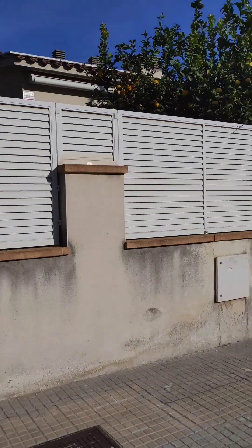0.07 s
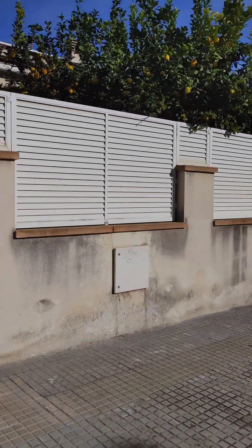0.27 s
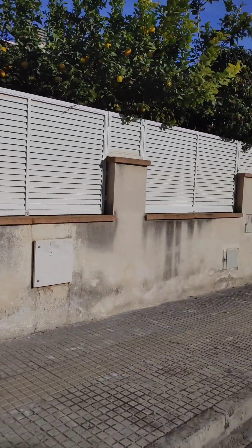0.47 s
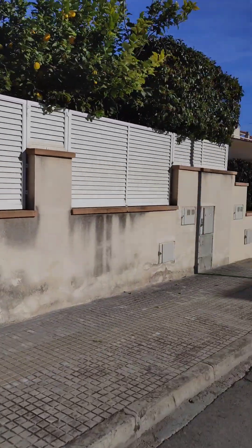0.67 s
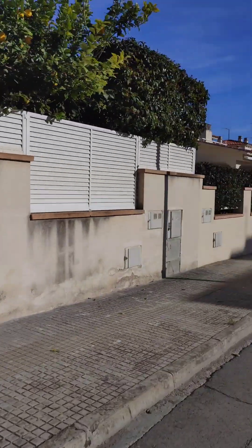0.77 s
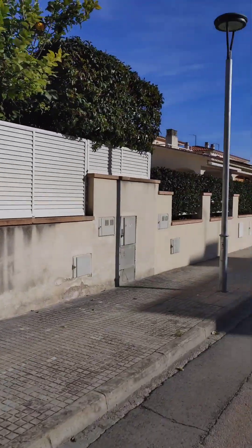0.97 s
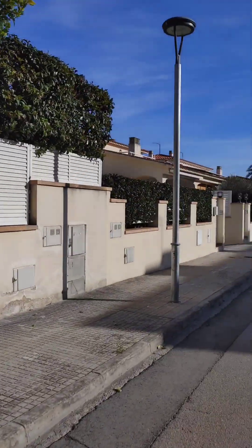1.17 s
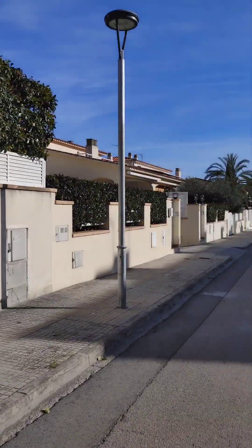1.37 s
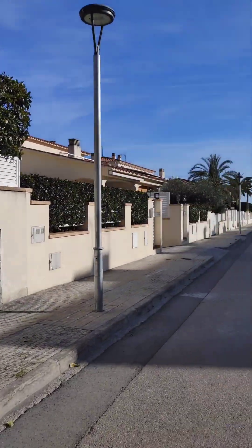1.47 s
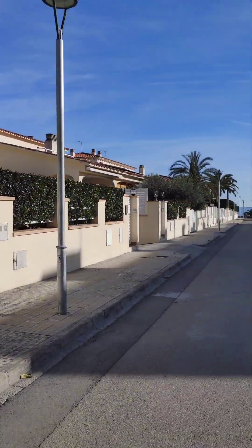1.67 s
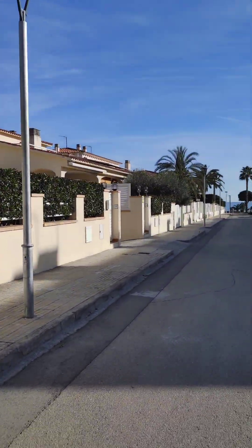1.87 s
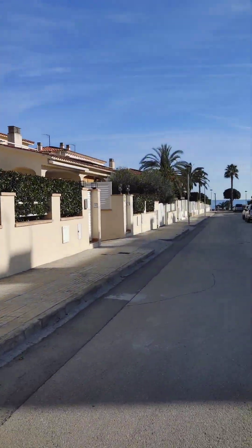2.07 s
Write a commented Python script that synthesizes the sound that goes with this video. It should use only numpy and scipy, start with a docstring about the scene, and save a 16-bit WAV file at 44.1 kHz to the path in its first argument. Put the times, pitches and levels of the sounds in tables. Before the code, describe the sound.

A dove coos in soft falling notes while low wind buffets the microphone outdoors

```python
"""Dove in a quiet street

A dove coos in gliding, near-pure tones while someone walks along with a hand-held camera. Light wind
buffets the two microphone ports as low shaped noise plus short thuds. A small metal piece, perhaps keys
or a zip pull, clinks close by as ringing modes. Dry ticks are short noise bands, small birds chirp far off
as fluttering glides, and the neighbourhood is a soft wash of shaped noise."""
import sys
import numpy as np
from scipy import signal
from scipy.fft import rfft, irfft
from scipy.io import wavfile
from scipy.ndimage import uniform_filter1d

SR = 44100
rng = np.random.default_rng(int(sys.argv[2]) if len(sys.argv) > 2 else 0)


def wrap_up_sound(samples):
    """Save the sound to the file named by the first command line argument, as 16-bit audio."""
    columns = np.atleast_2d(samples).T
    # keep every value between -1 and 1, then stretch to whole-number steps
    tamed = np.clip(columns, -1, 1)
    steps = np.round(tamed * 32767).astype(np.int16)
    wavfile.write(sys.argv[1], SR, steps)


N = 93888
T = np.arange(N) / SR  # time [s]

# notes of the cooing, one list each: (time [s], pitch [Hz], level [dB])
COO_NOTES = [
    [(-.02, 613.5, -66), (.075, 573.4, -66), (.125, 532, -68), (.165, 475.7, -55), (.2, 436.8, -56),
     (.262, 396.5, -56), (.28, 387, -50.5)],
    [(.575, 489, -64), (.612, 535, -58.5), (.645, 533, -65), (.69, 519, -56.5), (.765, 497, -64)],
    [(.625, 480, -58), (.665, 469, -57)],
    [(.782, 487.5, -56), (.825, 426, -55.5), (.86, 456, -58.5), (.885, 414, -56)],
    [(.932, 445, -51), (.96, 435.8, -56), (.99, 435.7, -49.5), (1.018, 444.8, -47.5), (1.04, 421.3, -54),
     (1.09, 409, -55.5), (1.135, 361.4, -55.5), (1.2, 331, -58)],
    [(1.4, 433.7, -51), (1.425, 463.5, -53), (1.465, 459, -48), (1.505, 463.3, -53), (1.54, 467, -56),
     (1.585, 449, -54.5)],
]
# husky band above one coo: (start [s], length [s], centre [Hz], level [dB])
HUSKY_BAND = (.56, 0.01, 912, -66.5)
# wind strength at each port: (time [s], level [dB])
WIND_LEFT = [(0, -73), (.35, -57), (.51, -49.5), (.55, -55.5), (.585, -40), (.67, -57.5), (.87, -46.5),
             (1.07, -51), (1.11, -35.5), (1.2, -51.5), (1.33, -32), (1.385, -46.5), (1.41, -67),
             (1.56, -74), (1.68, -43), (1.78, -76), (2.13, -67)]
WIND_RIGHT = [(0, -29.5), (.115, -30), (.2, -53.5), (.34, -66), (.38, -42.5), (.425, -64), (.465, -39),
              (.59, -68), (.67, -39), (.77, -37.5), (.81, -41.5), (.97, -38.5), (1.08, -38.5), (1.29, -43),
              (1.405, -37), (1.43, -31), (1.61, -35.5), (1.66, -44.5), (1.75, -33.5), (1.9, -35.5),
              (2.06, -35), (2.13, -47)]
# relative colour of the wind rumble before its shift: (frequency [Hz], density [dB per Hz])
RUMBLE_LEFT = [(20, -20), (50, -10), (100, 0), (155, 0), (200, -10), (260, -24), (400, -37), (600, -52),
               (1500, -80)]
RUMBLE_RIGHT = [(20, -21), (50, -22), (95, 4), (155, 7.5), (230, -8.5), (340, -13.5), (450, -36.5),
                (600, -34), (1500, -83)]
# shift of the right port's rumble, higher in faster air: (time [s], frequency ratio [1])
EDDY_SHIFT = [(0, 0.88), (.5, 0.67), (1, 1.21), (1.45, 1.12), (2.1, 1.135)]
# single eddies thudding on the right port: (time [s], pitch [Hz], level [dB])
EDDY_THUDS = [(0.064, 190, -25), (0.732, 219, -26), (0.77, 99, -27), (1.12, 360, -34), (1.166, 345, -34),
              (1.425, 173, -26), (1.435, 300, -29.5), (1.526, 310, -32.5), (1.689, 355, -32),
              (1.748, 286, -31.5), (1.774, 279, -28), (1.862, 298, -30), (1.9, 112, -27.5),
              (2.036, 354, -29.5)]
# clinks of metal: (time [s], level [dB], frequency around which the metal rings most [Hz])
CLINKS = [(.411, -56.5, 5740), (0.955, -57.5, 5750), (0.974, -57, 6600), (1.588, -62, 5700),
          (1.663, -52.5, 4450), (1.696, -58, 5600), (1.73, -58.5, 4800), (1.983, -50.5, 5240),
          (2.015, -59.5, 5000), (2.119, -54, 5000)]
# ringing modes of the metal, before random spread: (frequency [Hz], relative level [dB], t60 [s])
METAL_MODES = [(3860, -16, .025), (4370, -15, .035), (5025, -14, .06), (5740, -16, .05), (6600, -18, .03),
               (9390, -21, .04)]
# light dry ticks, like grit under a shoe: (time [s], level [dB], centre [Hz])
TICKS = [(0.198, -63.5, 10900), (0.242, -65, 6400), (1.078, -57, 1620), (1.836, -67.5, 4140),
         (2.052, -64, 4150), (2.118, -59, 1700)]
# chirps of small birds: (start [s], length [s], start pitch [Hz], end pitch [Hz], level [dB])
CHIRPS = [(0.138, 0.15, 6290, 6600, -76), (0.58, 0.074, 6200, 6450, -74), (0.778, 0.048, 6850, 6850, -73.5),
          (0.869, 0.11, 2720, 2620, -76), (1.11, 0.054, 4190, 4750, -69.5),
          (1.165, 0.05, 4420, 4720, -74.5), (1.254, 0.046, 6660, 6310, -71.5),
          (1.303, 0.031, 4840, 5080, -65), (1.547, 0.045, 5700, 6000, -72.5)]
# relative colour of the distant street noise: (frequency [Hz], density [dB per Hz])
AIR_COLOUR = [(20, 7), (120, 7.5), (330, 10.5), (480, 6.5), (620, 1), (880, -2), (1100, -7.5), (1400, -4),
              (2500, -7), (3200, -12), (4200, -11.5), (6700, -17), (7800, -26), (9500, -19.5), (15500, -20)]
# its stereo balance: (frequency [Hz], left minus right [dB])
AIR_PAN = [(100, -4), (700, -1), (1500, -5), (2800, 0), (5500, -4.5), (9000, -4), (15000, -0.5)]
# its left-right likeness: (frequency [Hz], correlation [1])
AIR_LIKENESS = [(100, 1), (600, 0.31), (1500, 0.069), (4000, 0.027)]
# its loudness: (time [s], level [dB])
AIR_LEVEL = [(0, -56), (.1, -60), (.18, -55.5), (.35, -56.5), (.68, -55.5), (1.12, -55), (1.47, -59.5),
             (1.6, -56.5), (1.69, -53.5), (1.8, -58), (2.13, -56.5)]

COO_EDGE_S, COO_JITTER, COO_SHIMMER_DB = .009, .011, 1.8  # jitter as a share of pitch, rms
OVERTONE_DB, COO_PAN_DB, COO_ECHO_DB = -33, 0.5, -12.5
FLUTTER_DB, FLUTTER_HZ = 1.4, 32
BUFFET_CYCLES = 1.23  # half-width of a thud, in cycles of its pitch
FAVOUR_DB, FAVOUR_HZ = 10.5, 435  # boost and half-width around a clink's favoured frequency
MODE_SPREAD_DB, MODE_DETUNE = 3, .012
SCRAPE_DB, SCRAPE_S = -12, 0.0043
CLINK_RISE_S, CLINK_PAN_DB, PORT_DELAY_S = 0.0035, -16, .0005
TICK_S, TICK_PAN_DB = 0.0061, -15
CRACKLE_DB, CRACKLE_PER_S = -71, 16
CHIRP_JITTER, CHIRP_FLUTTER_DB, CHIRP_FLUTTER_HZ = .018, 3.5, 70
CHIRP_PAN_DB, CHIRP_ECHO_DB = -12, -2
STREET_T60_S = 0.5
AIR_PATCH_DB = 1.3
EDGE_HZ = 15700
FRAME, HOP = 2048, 512  # short-time spectra [samples]


def amp(db):
    """Decibels to gain."""
    return 10 ** (np.asarray(db) / 20)


def unit(x):
    """Scales to rms 1."""
    return x / np.sqrt(np.mean(x ** 2) + 1e-20)


def curve(points, t=T):
    """Reads a table over time."""
    return np.interp(t, *np.transpose(points))


def read(points, hz):
    """Reads a table over log frequency."""
    f, value = np.transpose(points)
    return np.interp(np.log(hz + 1), np.log(f + 1), value)


def glide(hz):
    """Phase [radians] of a tone whose pitch moves over time."""
    return 2 * np.pi * np.cumsum(hz) / SR


def pan(db):
    """Left and right gains for a level difference."""
    db = np.atleast_1d(db)
    return amp(np.array([db, -db]) / 2)


def add(mix, s, sound):
    """Mixes a sound in at a time."""
    part = mix[max(round(s * SR), 0):][:len(sound)]
    part += sound[:len(part)]


def noise(lo_hz, hi_hz):
    """Noise of rms 1 between two soft edges."""
    f = np.fft.rfftfreq(N, 1 / SR) + 1e-3
    spectrum = rfft(rng.standard_normal(N))
    spectrum = spectrum / (1 + (f / hi_hz) ** 4) / (1 + (lo_hz / f) ** 4)
    return unit(irfft(spectrum, N))


def cells(shape):
    """Random complex short-time spectra."""
    return rng.standard_normal(shape) + 1j * rng.standard_normal(shape)


def frames():
    """Bin frequencies and frame times of the short-time spectra."""
    return np.fft.rfftfreq(FRAME, 1 / SR), np.arange(N // HOP + 3)[:, None] * HOP / SR


def sound_of(z):
    """Short-time spectra to a signal of rms 1."""
    x = signal.istft(np.swapaxes(z, -1, -2), nperseg=FRAME, noverlap=FRAME - HOP)[1]
    return unit(x[..., :N])


def smooth(x, size, axis=-1):
    """Running mean, applied twice."""
    return uniform_filter1d(uniform_filter1d(x, size=size, axis=axis), size=size, axis=axis)


def street(x):
    """Scattered, decaying echoes from garden walls and house fronts, separate for each side."""
    t = np.arange(SR // 2) / SR
    hit = rng.random((2, len(t))) < 2000 / SR  # about 2000 echoes per second
    taps = rng.standard_normal(hit.shape) * hit * (t > .012) * amp(-60 * t / STREET_T60_S)
    taps /= np.linalg.norm(taps, axis=1, keepdims=True)
    return signal.fftconvolve(x[None], taps, axes=1)[:, :N]


def dove():
    """Each coo is an almost pure, slightly unsteady gliding tone; a faint husky band lies above one of them."""
    out = np.zeros(N)
    for note in COO_NOTES:
        s, hz, db = np.transpose(note)
        phase = glide(np.interp(T, s, hz) * (1 + COO_JITTER * noise(14, 50)))
        tone = unit(np.sin(phase) + amp(OVERTONE_DB) * np.sin(2 * phase))
        to_edge = np.minimum(T - s[0], s[-1] - T)
        gate = np.sin(np.pi / 2 * np.clip(to_edge / COO_EDGE_S, 0, 1)) ** 2
        out += gate * amp(np.interp(T, s, db) + COO_SHIMMER_DB * noise(27, 27)) * tone
    start, length, hz, db = HUSKY_BAND
    size = round(length * SR)
    husk = noise(0.78, 16) * np.sin(2 * np.pi * hz * T)  # slow noise on a carrier
    add(out, start, amp(db) * husk[:size] * signal.windows.tukey(size))
    return pan(COO_PAN_DB) * (out + amp(COO_ECHO_DB) * street(out))


def rumble(level, spectrum, shift):
    """Turbulence at one port: low noise that follows the gusts and flutters."""
    hz, t = frames()
    x = sound_of(cells((len(t), len(hz))) * amp(read(spectrum, hz / shift)))
    x /= np.sqrt(smooth(x ** 2, 1400) + 1e-6)  # even out, so the gusts set the level
    return x * amp(curve(level) + FLUTTER_DB * noise(9.3, FLUTTER_HZ))


def wind():
    """Unrelated rumble at the two ports, with short thuds on the windward right one."""
    left = rumble(WIND_LEFT, RUMBLE_LEFT, 0.95)
    right = rumble(WIND_RIGHT, RUMBLE_RIGHT, curve(EDDY_SHIFT, frames()[1]))
    for s, hz, db in EDDY_THUDS:
        cycles = hz * (T - s)
        bump = np.exp(-(cycles / BUFFET_CYCLES) ** 2)
        right += amp(db) * bump * np.sin(2 * np.pi * (cycles + rng.random()))
    return np.array([left, right])


def clinks():
    """Metal brushes metal: a brief scrape swells into a short, varying ring, at the right port first."""
    out = np.zeros(N)
    for s, db, main_hz in CLINKS:
        since = np.clip(T - s, 0, 1)
        swell = np.exp(-(np.minimum(T - s, 0) / CLINK_RISE_S) ** 2)
        for hz, level, t60 in METAL_MODES:
            favour = FAVOUR_DB * np.exp(-((hz - main_hz) / FAVOUR_HZ) ** 2)
            level = level + favour + MODE_SPREAD_DB * rng.uniform(-1.1, 1)
            mode_hz = hz * (1 + MODE_DETUNE * rng.uniform(-1.2, 1))
            decay = amp(db + level - 60 * since / t60)
            out += swell * decay * np.sin(2 * np.pi * mode_hz * T)
        out += amp(db + SCRAPE_DB) * np.exp(-((T - s) / SCRAPE_S) ** 2) * noise(3900, 6600)
    late = np.roll(out, round(PORT_DELAY_S * SR))
    return pan(CLINK_PAN_DB) * np.array([late, out])


def ticks():
    """Dry, ringless ticks an octave wide, with a sparse crackle of faint ones at random times."""
    out, fade = np.zeros(N), np.exp(-T / TICK_S)
    crackle = []
    for place, size, octave in rng.random((round(CRACKLE_PER_S * N / SR), 3)):
        db = CRACKLE_DB + MODE_SPREAD_DB * (2 * size - 1)
        crackle.append((place * N / SR, db, 2700 * 2 ** octave))
    for s, db, hz in list(TICKS) + crackle:
        add(out, s, amp(db) * noise(hz / np.sqrt(2), hz * np.sqrt(2)) * fade)
    return pan(TICK_PAN_DB) * out


def small_birds():
    """Thin, wavering, fluttering glides, blurred by the street."""
    out, waver = np.zeros(N), noise(18, 280)
    for start, length, from_hz, to_hz, db in CHIRPS:
        u = np.clip((T - start) / length, 0, 1)  # progress through the chirp
        hz = (from_hz + (to_hz - from_hz) * u) * (1 + CHIRP_JITTER * waver)
        swell = np.sqrt(2 * abs(np.sin(np.pi * u)))
        out += amp(db) * swell * np.sin(glide(hz))
    out *= unit(amp(CHIRP_FLUTTER_DB * noise(CHIRP_FLUTTER_HZ / 2, CHIRP_FLUTTER_HZ)))
    return pan(CHIRP_PAN_DB) * (out + amp(CHIRP_ECHO_DB) * street(out))


def air():
    """The neighbourhood's soft, gently uneven wash: shaped noise, less alike left to right in the treble."""
    hz, t = frames()
    a, b = cells((2, len(t), len(hz)))
    same = np.clip(read(AIR_LIKENESS, hz), -1, 1)
    # uneven patches over time and frequency
    patches = rng.standard_normal(a.shape)
    patches = uniform_filter1d(uniform_filter1d(patches, size=6, axis=0), size=30, axis=1)
    colour = amp(read(AIR_COLOUR, hz) + AIR_PATCH_DB * unit(patches))
    z = np.array([a, same * a + np.sqrt(1 - same ** 2) * b]) * pan(read(AIR_PAN, hz))[:, None]
    return sound_of(z * colour) * amp(curve(AIR_LEVEL))


def scene():
    """Everything that reaches the two ports."""
    return dove() + wind() + clinks() + ticks() + small_birds() + air()


def record(dry):
    """The recorder's band limit: a steep low-pass."""
    lowpass = signal.firwin(511, EDGE_HZ, window=("kaiser", 9), fs=SR)
    return signal.oaconvolve(dry, lowpass[None], "same")


dry = scene()
out = record(dry)
wrap_up_sound(out)
```